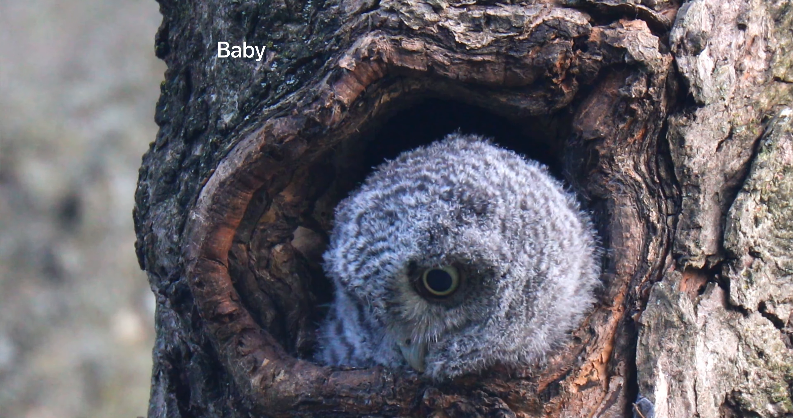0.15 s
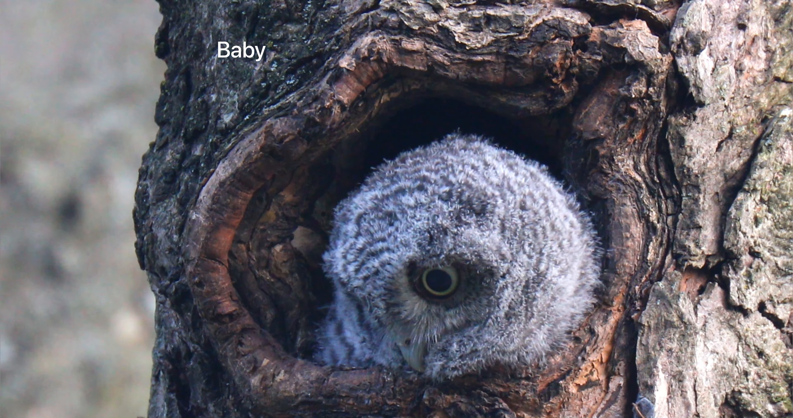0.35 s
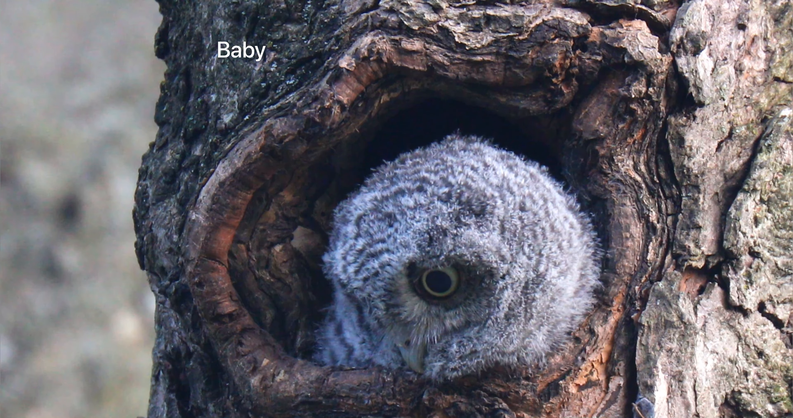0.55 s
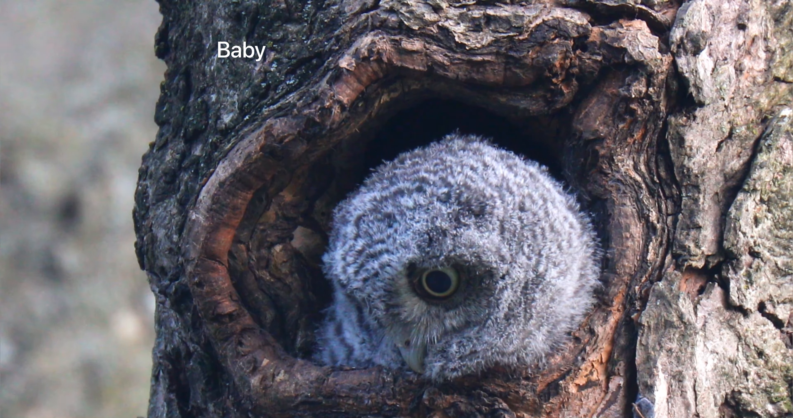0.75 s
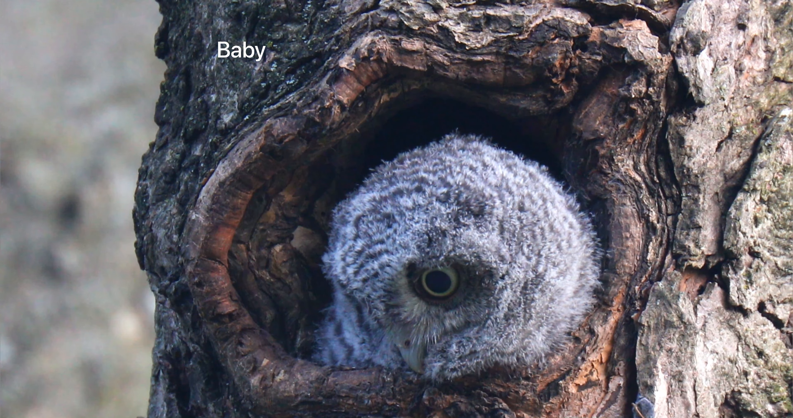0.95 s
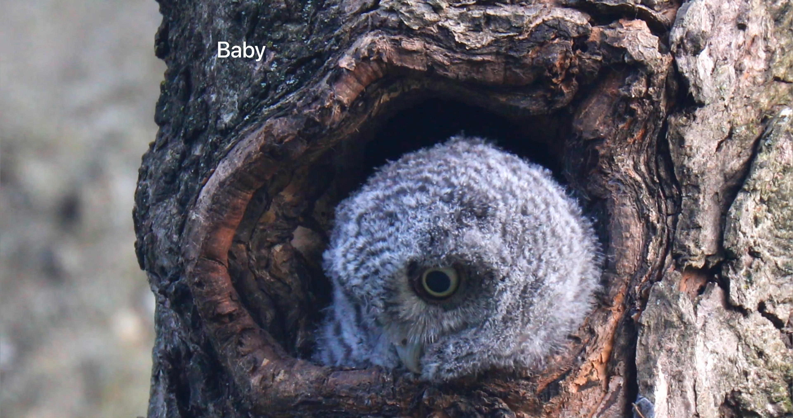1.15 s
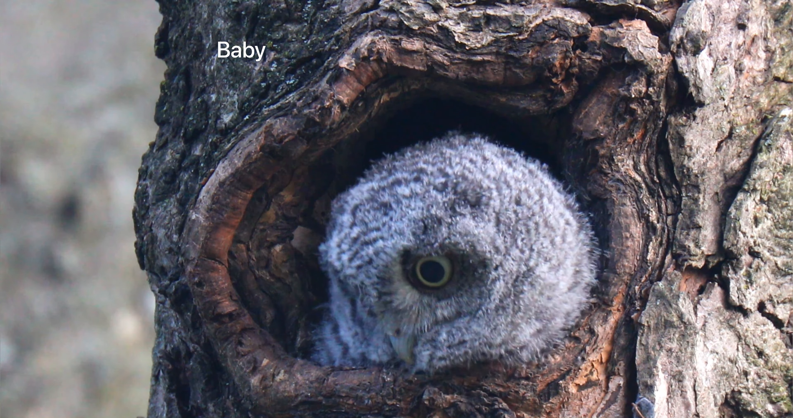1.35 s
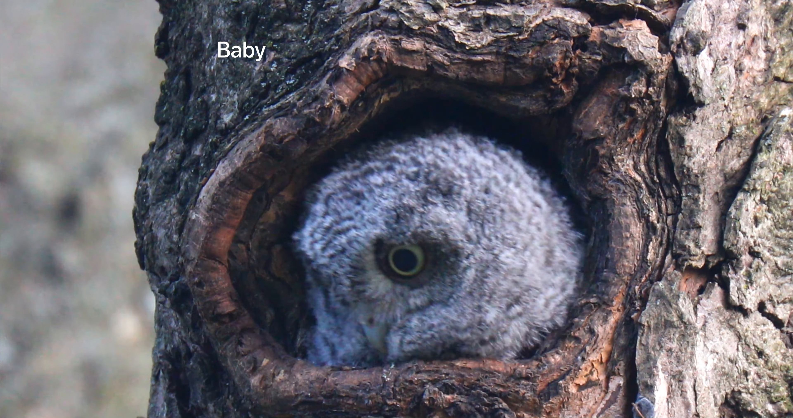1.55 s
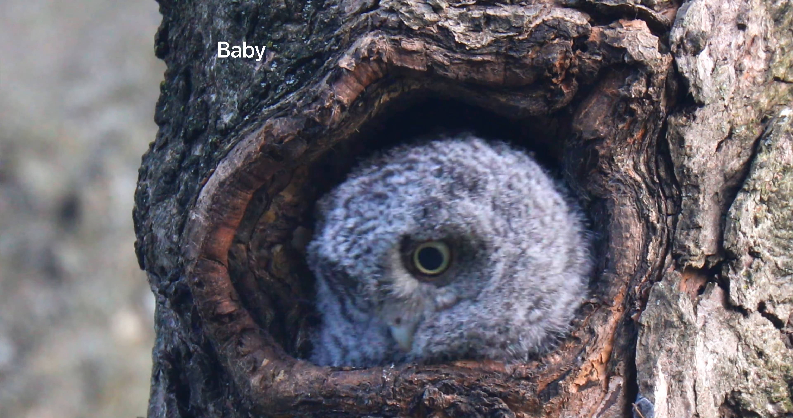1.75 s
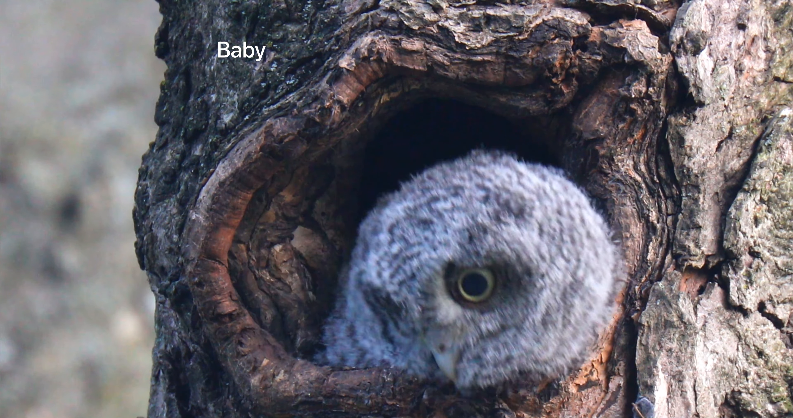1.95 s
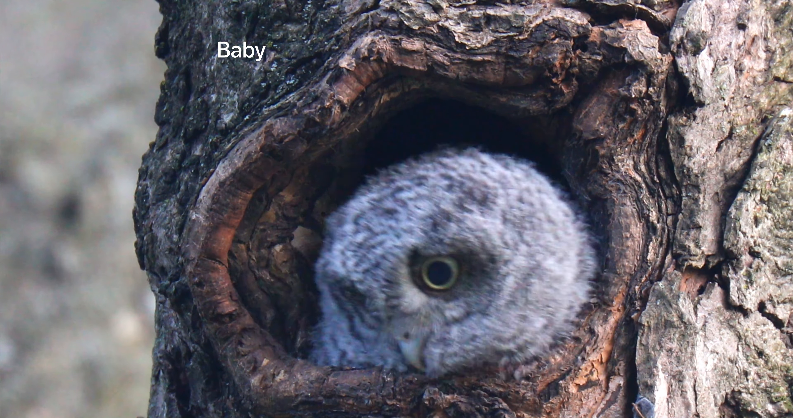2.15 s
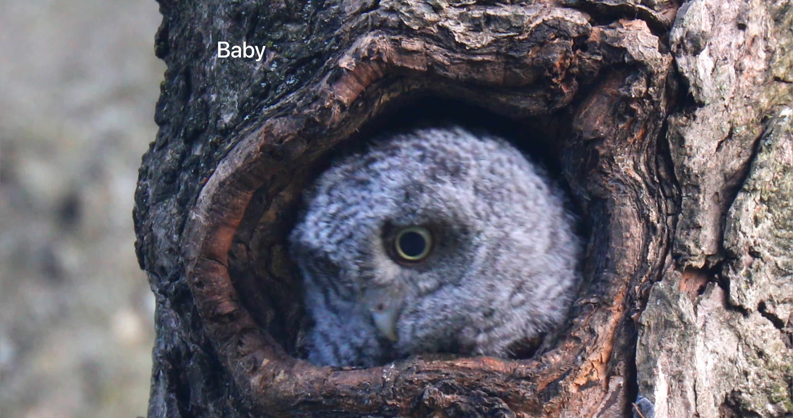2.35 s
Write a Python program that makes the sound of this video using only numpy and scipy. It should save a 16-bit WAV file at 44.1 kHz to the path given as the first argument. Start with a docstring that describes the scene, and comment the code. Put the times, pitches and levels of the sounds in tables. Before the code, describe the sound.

One low, purring owl trill, round and whistle-like, pulses fast on an almost steady pitch with a faint echo from trees; low rumble, thin hiss and barely audible rustles lie behind, recorded fairly close, in mono.

```python
"""A small owl gives one low, rapid trill from a tree: 29 short hoots, each a little arch of pitch.
Each hoot is a phase-locked sum of harmonics: the fundamental swells with pitch, the octave rings in
the throat, a thin high resonance glints on top. The trees add a faint echo of decaying noise.
Behind lie outdoor rumble and hiss and a few soft rustles, all shaped noise."""
import sys
import numpy as np
from scipy import signal
from scipy.fft import rfft, irfft
from scipy.io import wavfile
from scipy.ndimage import uniform_filter1d

SR = 44100
rng = np.random.default_rng(int(sys.argv[2]) if len(sys.argv) > 2 else 0)


def put_to_file(sound):
    """Save the sound as 16-bit audio at rate SR, in the file named by the first command-line argument."""
    columns = np.atleast_2d(sound).T  # one column per channel
    safe = np.clip(columns, -1, 1)
    whole_steps = np.round(safe * 32767)
    wavfile.write(sys.argv[1], SR, whole_steps.astype(np.int16))


N = 105840

# Outdoor noise spectrum. Each row: frequency in Hz, relative density in dB.
OUTDOORS_SPECTRUM = [(15, -13.5), (25, -1), (55, 3.5), (90, -6), (128, 3), (175, -7), (250, -9),
                     (340, -4.5), (460, -14), (800, -16.5), (1300, -21), (2000, -22.5), (3200, -29.5),
                     (4400, -25), (4900, -29.5), (5400, -26), (5750, -35), (8000, -37), (10000, -41),
                     (15500, -44.5)]
# Hoots of the trill. Each row: start in seconds, length in seconds, level of the fundamental at its
# top in dB, top pitch in Hz, scoop up to the top in Hz, place of the top as a share of the length.
HOOTS = [(0.1481, 0.032, -32.5, 622.6, 14, 0.27), (0.2211, 0.034, -21.5, 636.5, 43, 0.11),
         (0.2866, 0.044, -20, 643, 8.3, 0.53), (0.3595, 0.046, -17.5, 656, 13, 0.57),
         (0.432, 0.047, -16.5, 660.7, 18, 0.47), (0.5023, 0.049, -16.5, 665.7, 30, 0.47),
         (0.5752, 0.048, -15.7, 666.7, 35, 0.57), (0.6497, 0.046, -15.5, 670, 44, 0.59),
         (0.7226, 0.046, -14.5, 673.7, 49, 0.5), (0.7951, 0.046, -15, 675.8, 48, 0.48),
         (0.8669, 0.045, -15.2, 671.4, 51, 0.46), (0.9357, 0.045, -15.5, 671, 57, 0.54),
         (1.0061, 0.041, -15, 670.3, 48, 0.53), (1.0737, 0.04, -15.5, 667.6, 62, 0.43),
         (1.1405, 0.04, -16, 665, 45, 0.48), (1.2095, 0.054, -16.1, 665, 42, 0.35),
         (1.3, 0.06, -15.5, 666, 33, 0.29), (1.398, 0.058, -15.9, 661.5, 27, 0.32),
         (1.4929, 0.053, -15, 666.6, 29, 0.29), (1.5842, 0.039, -14.5, 672, 37, 0.31),
         (1.6595, 0.036, -13.5, 679, 40, 0.38), (1.7175, 0.036, -14.5, 670.5, 54, 0.42),
         (1.7794, 0.033, -15.0, 669, 37, 0.54), (1.8398, 0.034, -15.5, 664.4, 42, 0.35),
         (1.9025, 0.032, -15.8, 665.4, 29, 0.47), (1.9634, 0.033, -16.0, 663, 32, 0.4),
         (2.026, 0.032, -16.5, 663, 28, 0.42), (2.0893, 0.032, -17.0, 658, 33, 0.38),
         (2.1566, 0.028, -31.5, 615, 14, 0.28)]
# Catch of the voice along the trill. Each row: time in seconds, knock level in dB, lead-in level in dB,
# both against the driven fundamental.
VOICE_CATCH = [(.15, -28, -17), (0.231, -11.5, -16), (.3, -12, -12.5), (.43, -11, -9), (0.519, -20, -4.5),
               (.65, -29, 0), (1.299, -16.5, -3.5), (1.66, -19.5, -3), (2.1, -22, -3)]
# Harmonics from the third up. Each row: frequency in Hz, level in dB against the fully driven fundamental.
OVERTONE_SPECTRUM = [(1700, -27), (2000, -31.5), (2650, -37), (3300, -45.5), (4000, -53.5), (5300, -66.5),
                     (6600, -69.5), (14000, -93)]
# Thin high ring of the voice. Each row: frequency in Hz, level in dB against the driven fundamental.
SHEEN_SPECTRUM = [(4500, -71), (5900, -60), (6600, -56.5), (7400, -59), (8600, -65), (9800, -77.5),
                  (11000, -69.5), (12000, -69), (13000, -70), (14000, -82)]
# Thin high resonance along the trill. Each row: time in seconds, centre in Hz, level in dB.
GLINT_TRACK = [(.23, 8940, -50), (.3, 8310, -37.5), (.38, 7940, -43), (0.599, 7830, -41),
               (0.949, 7770, -46), (1.45, 7680, -52), (1.68, 7950, -50), (2.099, 7800, -46.5)]
# Spectrum of the air noise in the voice. Each row: frequency in Hz, relative density in dB.
AIR_SPECTRUM = [(300, -18), (700, 5.5), (1400, -8.5), (2500, -9.5), (5000, -20.5), (8000, -17),
                (10000, -26), (15000, -32)]
# Soft rustles. Each row: middle in seconds, half length (to 1/e) in seconds, level in dB,
# centre in Hz, width (at -6 dB) in Hz.
RUSTLES = [(1.02, 0.14, -54.5, 1850, 700), (1.23, .04, -56, 1890, 900), (1.408, 0.026, -46.5, 2030, 900),
           (1.49, 0.1, -53.5, 1550, 250), (1.575, 0.052, -53.5, 1920, 900), (1.63, 0.065, -53, 1560, 350),
           (1.8, 0.19, -62, 1710, 700), (2.056, 0.032, -48.5, 1800, 900), (2.125, 0.043, -55, 1600, 400)]

OUTDOORS_DB, OUTDOORS_DRIFT_DB = -45, 0.13
REST_HZ, FULL_HZ = 553.4, 660.3  # pitch of the slack and of the fully driven voice
SAG_SHARE = 0.5  # share of the pitch rise lost after the top
DROP_LEAD_S, DROP_S = 0.005, 0.0025  # pitch drop centres this long before the end; its softness
# Softness of the edges; the release centres RELEASE_LEAD_S before the end.
ATTACK_S, RELEASE_S, RELEASE_LEAD_S = 0.00074, 0.0015, 0.0018
TAIL_S, TAIL_LAG_S = 0.003, 0.0011  # the fundamental rings on a moment: softness, lag past the end
LEAD_IN_S = 0.0024  # softness of the fundamental's stir before the voice catches
CATCH_HZ, CATCH_DECAY_S = 813, 0.0014
SWELL_DB_PER_HZ, OVERTONE_SWELL_DB_PER_HZ = 0.1694, 0.2  # growth with pitch
OCTAVE_HZ, OCTAVE_WIDTH_HZ, OCTAVE_DB = 1220, 257, -10  # throat resonance on the second harmonic
GLINT_WIDTH_HZ = 420  # at -6 dB
SHEEN_FLICKER_DB, SHEEN_FLICKER_PER_S = 3.5, 120
JITTER_SHARE, SHIMMER_DB = 0.00067, 0.5  # spread of pitch and of level
AIR_DB = -46.5
ECHO_DB, ECHO_T60_S, ECHO_DELAY_S = -26.5, 0.12, 0.022
RUSTLE_UNEVENNESS_DB = 1.3
TOP_HZ = 15600


def undb(db):
    """Decibels to gain."""
    return 10 ** (np.asarray(db) / 20)


def colour(hz, points):
    """Gain at these frequencies of a (Hz, dB) spectrum, interpolated over log frequency."""
    point_hz, point_db = np.array(points).T
    return undb(np.interp(np.log(np.maximum(hz, 1)), np.log(point_hz), point_db))


def noise(points):
    """Noise of rms 1 with the given spectrum."""
    spectrum = rfft(rng.standard_normal(N)) * colour(np.fft.rfftfreq(N, 1 / SR), points)
    x = irfft(spectrum, N)
    return x / x.std()


def walk(rate_per_s):
    """Smooth chance with a spread of 1: white noise averaged twice over 1 / rate."""
    k = max(int(SR / rate_per_s), 1)
    x = uniform_filter1d(rng.standard_normal(N), k, mode="wrap")
    x = uniform_filter1d(x, k, mode="wrap")
    return x / x.std()


def step(x):
    """Soft step from 0 to 1 around x = 0."""
    return 0.5 + 0.5 * np.tanh(x / 2)


def resonance(hz, centre_hz, width_hz):
    """Gain of a resonance, 1 at its centre, -3 dB across its width."""
    return 1 / np.hypot(1, 2 * (hz - centre_hz) / width_hz)


def outdoors():
    """Almost steady low rumble and fine hiss: shaped noise with a slight level drift."""
    return undb(OUTDOORS_DB + OUTDOORS_DRIFT_DB * walk(3.9)) * noise(OUTDOORS_SPECTRUM)


def hoot_pitch(t, length, top_hz, scoop_hz, crest):
    """Voice tension sets pitch: it scoops up to its top, sags, and drops to rest as the hoot closes."""
    def closing(at):
        return step((length - DROP_LEAD_S - at) / DROP_S)

    u = np.clip(t / length, 0, 1)
    crest = np.clip(crest, 0.05, 0.9)
    rise = np.maximum(1 - u / crest, 0) ** 1.8
    fall = (np.maximum(u - crest, 0) / (1 - crest)) ** 1.7
    drop = np.minimum(closing(t) / closing(crest * length), 1)
    tension = (1 - SAG_SHARE * fall) * drop
    return REST_HZ + (top_hz - REST_HZ) * tension - scoop_hz * rise


def overtones(start, hz, phase):
    """Harmonics from the third up: the low ones swell with pitch, the high ones flicker and glint."""
    when, centre, level = np.array(GLINT_TRACK).T
    glint_hz = np.interp(start, when, centre)
    glint_db = np.interp(start, when, level)
    swell = undb(OVERTONE_SWELL_DB_PER_HZ * (hz - FULL_HZ))
    t, out = np.arange(len(hz)) / SR, 0
    for k in range(3, 22):
        chance = rng.standard_normal(size=32)
        flicker_db = SHEEN_FLICKER_DB * np.interp(t * SHEEN_FLICKER_PER_S, np.arange(len(chance)), chance)
        low = swell * colour(k * hz, OVERTONE_SPECTRUM)
        glint = undb(glint_db) * resonance(k * hz, glint_hz, GLINT_WIDTH_HZ) ** 2
        high = undb(flicker_db) * (colour(k * hz, SHEEN_SPECTRUM) + glint)
        out = out + (low + high) * np.sin(k * phase)
    return out


def hoot(t, waver, start, length, db, top_hz, scoop_hz, crest):
    """One hoot: a decaying knock, and a strong fundamental, octave and overtones on one pitch."""
    when, knocks_db, lead_ins_db = np.array(VOICE_CATCH).T
    knock_db = np.interp(start, when, knocks_db)
    lead_in_db = np.interp(start, when, lead_ins_db)

    hz = hoot_pitch(t, length, top_hz, scoop_hz, crest) * waver
    phase = -2 * np.pi * np.cumsum(hz) / SR
    phase -= np.interp(0, t, phase)  # zero phase at the start

    onset = step(t / ATTACK_S)
    gate = onset * step((length - RELEASE_LEAD_S - t) / RELEASE_S)
    lead_in = undb(lead_in_db) * step(t / LEAD_IN_S) * (1 - onset)
    ringing = onset * step((length + TAIL_LAG_S - t) / TAIL_S)

    swell = undb(SWELL_DB_PER_HZ * (hz - FULL_HZ))
    fundamental = (ringing + lead_in) * swell * np.sin(phase)
    throat = undb(OCTAVE_DB) * resonance(2 * hz, OCTAVE_HZ, OCTAVE_WIDTH_HZ)
    octave = gate * throat * np.sin(2 * phase)
    since = np.maximum(t, 0)
    knock = undb(knock_db) * np.exp(-since / CATCH_DECAY_S) * np.sin(2 * np.pi * CATCH_HZ * since)
    tone = fundamental + octave + gate * overtones(start, hz, phase) - knock

    drive = undb(db - SWELL_DB_PER_HZ * (top_hz - FULL_HZ))
    return drive * tone, drive * gate


def owl():
    """The row of hoots, slightly unsteady in pitch and level, with a little air noise in each."""
    t = np.arange(N) / SR
    voice, flow = np.zeros(N), np.zeros(N)
    waver = 1 + JITTER_SHARE * walk(200)
    for row in HOOTS:
        start, length = row[:2]
        span = (t > start - 0.02) & (t < start + length + 0.03)
        tone, gate = hoot(t[span] - start, waver[span], *row)
        voice[span] += tone
        flow[span] += gate
    air = undb(AIR_DB) * flow * noise(AIR_SPECTRUM)
    return voice * undb(SHIMMER_DB * walk(230)) + air


def trees(x):
    """Faint, short, diffuse echo: convolution with delayed, decaying noise of unit energy."""
    t = np.arange(SR // 2) / SR
    decay = np.exp(-np.log(1000) * t / ECHO_T60_S)
    tail = rng.standard_normal(len(t)) * decay * (t > ECHO_DELAY_S)
    return undb(ECHO_DB) * signal.fftconvolve(x, tail / np.linalg.norm(tail))[:N]


def rustles():
    """Soft, uneven swells of mid-range noise, each in its own band."""
    t, hz, out = np.arange(N) / SR, np.fft.rfftfreq(N, 1 / SR), 0
    for middle_s, half_s, db, centre_hz, width_hz in RUSTLES:
        band = irfft(rfft(rng.standard_normal(N)) * resonance(hz, centre_hz, width_hz) ** 2, N)
        swell = np.exp(-((t - middle_s) / half_s) ** 2)
        out = out + undb(db) * swell * band / band.std()
    return out * undb(RUSTLE_UNEVENNESS_DB * walk(90))


def scene():
    """The owl and its echo over the background, one channel."""
    call = owl()
    return (outdoors() + call + trees(call) + rustles())[None]


def record(dry):
    """Steep elliptic low-pass cuts everything above TOP_HZ."""
    low_pass = signal.ellip(10, 0.1, 90, TOP_HZ, fs=SR, output="sos")
    return signal.sosfilt(low_pass, dry)


dry = scene()
out = record(dry)
put_to_file(out)
```